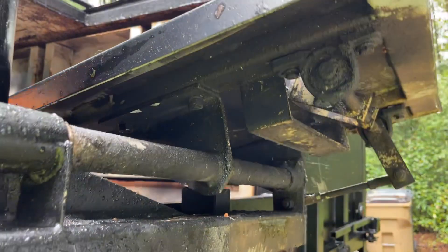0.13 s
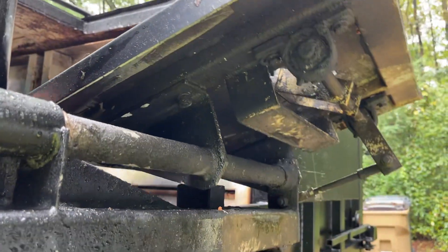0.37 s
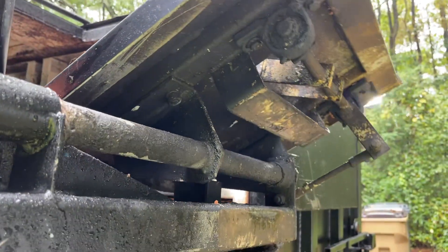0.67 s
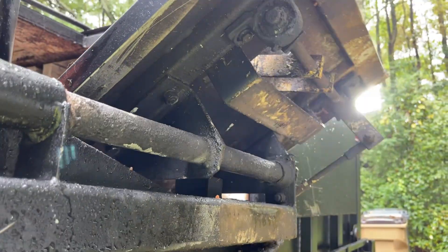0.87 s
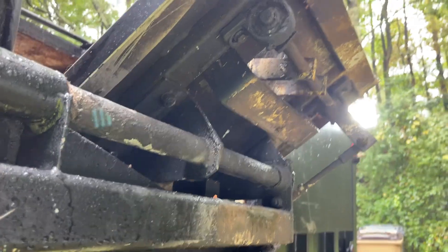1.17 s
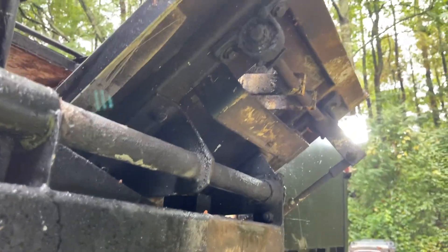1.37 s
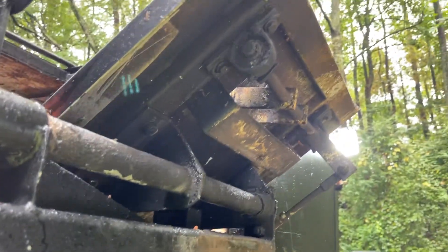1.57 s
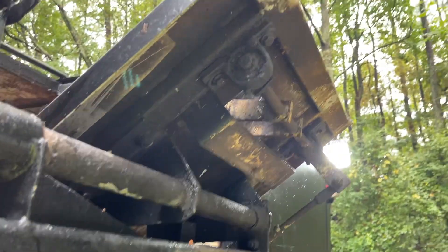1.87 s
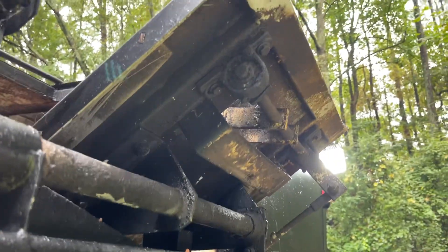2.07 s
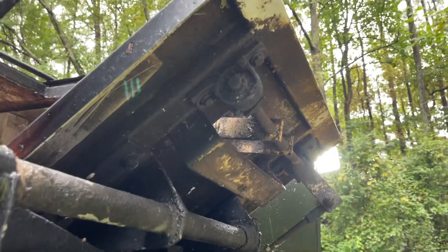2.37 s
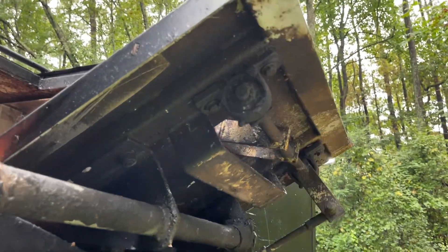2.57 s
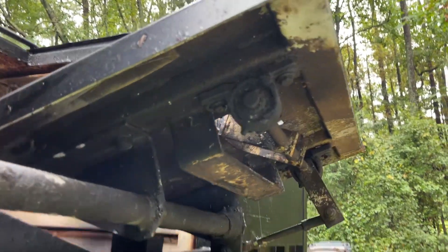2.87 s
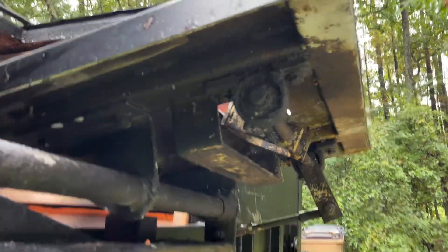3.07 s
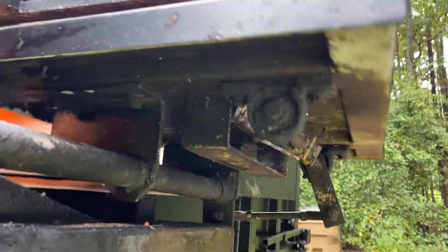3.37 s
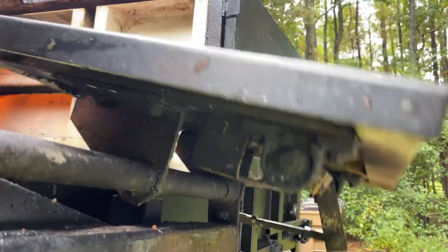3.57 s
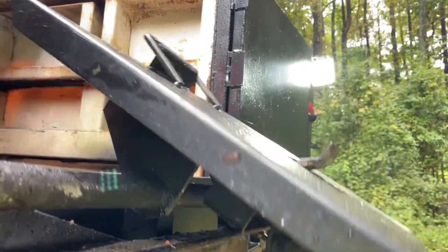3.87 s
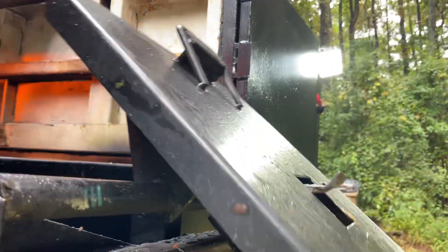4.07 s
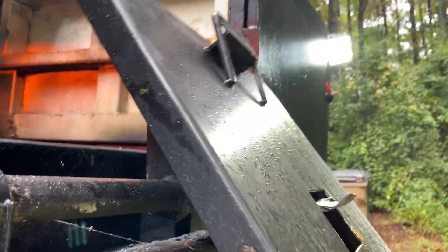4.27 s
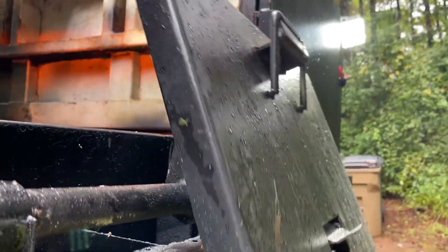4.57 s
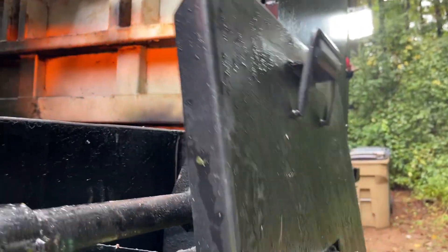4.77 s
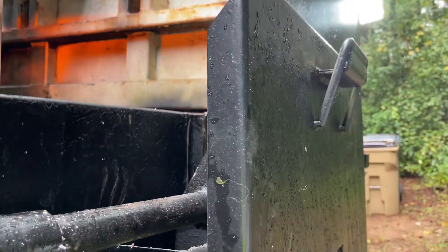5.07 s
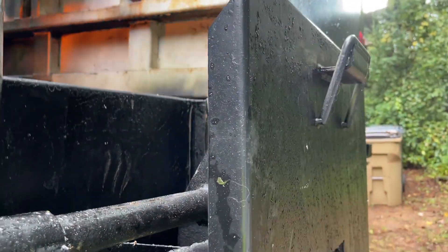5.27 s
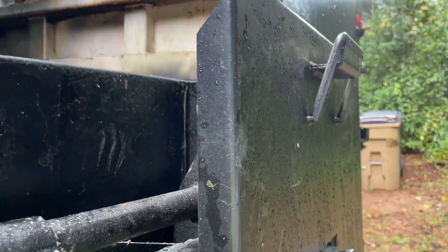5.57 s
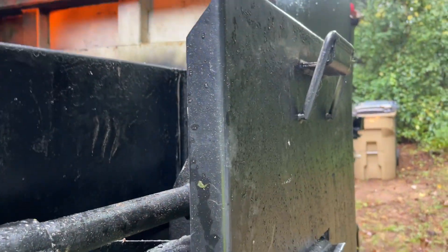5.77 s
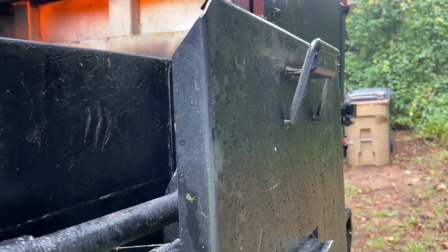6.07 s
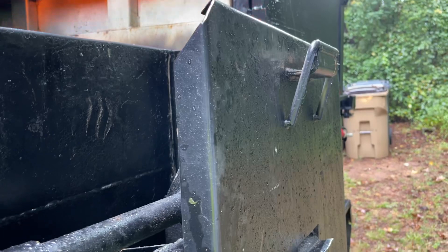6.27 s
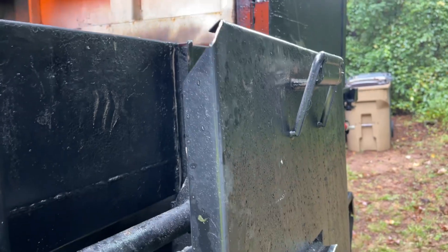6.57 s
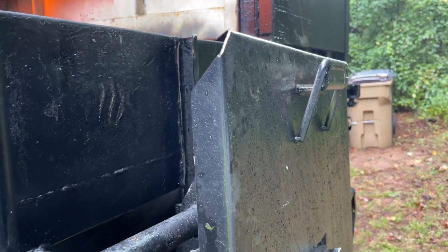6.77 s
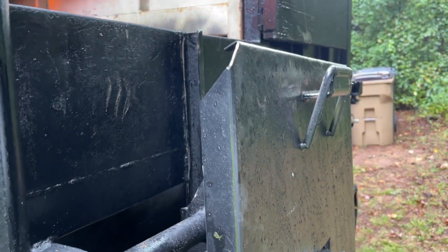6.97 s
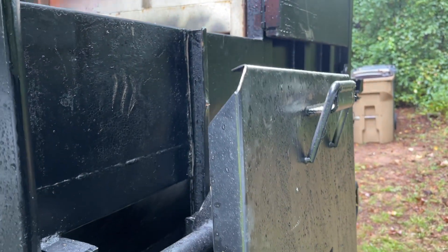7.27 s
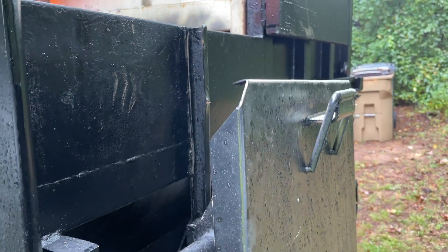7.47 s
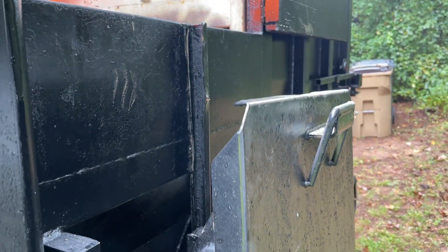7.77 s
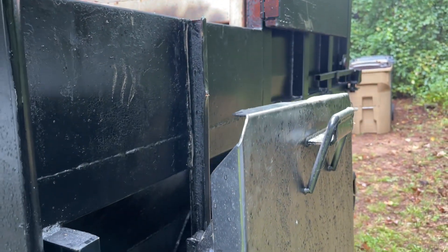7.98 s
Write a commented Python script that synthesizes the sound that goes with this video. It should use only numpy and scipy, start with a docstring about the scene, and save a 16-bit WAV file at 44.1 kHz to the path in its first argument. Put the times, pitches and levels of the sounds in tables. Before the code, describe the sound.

Near microphone beside a refuse truck's steel mechanism in a wood. The diesel idles steadily over quiet insect hiss. Sharp clanks start, then a short metal screech comes as the revs dip and rebound. A harder screech and heavy bangs follow, with loose rattling and a crowd of smaller knocks. These grow sparse under a wavering hydraulic hum, until a late clank and scrape; the hum then falls away, leaving idle and a tiny knock.

```python
"""A refuse truck idles in a wood: an eight-cylinder diesel throbs, sines at multiples of its cycle rate,
over filtered engine and fan noise, while insects hiss in two noise bands. Two soft rings come first. From 1.2 s
bursts of clicks make the steel panel and linkage knock and rattle, and slip pulses in noise make it screech.
The revs sag at 1.4 s and recover; then the rams work until 5.75 s and the gear pump's hum, sines at its tooth
rate and multiples, swells and wavers. The knocks crowd before 2.6 s, grow sparse until 4.9 s, and one last
knock comes near the end."""
import sys
import numpy as np
from scipy import signal
from scipy.fft import rfft, irfft
from scipy.io import wavfile

SR = 44100
rng = np.random.default_rng(int(sys.argv[2]) if len(sys.argv) > 2 else 0)


def transcribe(signal):
    """Save signal, clipped to [-1, 1], as a 16-bit WAV file at the path in sys.argv[1]."""
    frames = np.atleast_2d(signal).T
    limited = np.clip(frames, -1, 1)
    pcm = np.round(limited * 32767).astype(np.int16)
    wavfile.write(sys.argv[1], SR, pcm)


N = 358533
TIME = np.arange(N) / SR   # seconds
HZ = np.maximum(np.arange(N // 2 + 1) * SR / N, 1)   # spectrum frequencies, kept above zero for the logs

# Level difference between the ears: (frequency [Hz], left minus right [dB])
LEAN = [(60, 2), (150, -3), (350, 3.5), (860, 1.5), (2070, -2), (5030, 5), (12200, -2.5)]

IDLE_CYCLE_HZ = 4.99   # engine cycles (two crank turns) per second
TEETH_PER_CYCLE = 27.24   # pump teeth passing in one engine cycle
# A sudden load: start, depth factor, swing period, settling time
SAG_S, SAG_HZ, SAG_PERIOD_S, SAG_SETTLE_S = 1.42, 1.68, 1.1, .37
WORK_S, REST_S, WORK_FADE_S = 1.95, 5.75, 0.098   # the rams are under pressure between the first two
# At work the idle is lifted, then pulled down by the droop, which is full at the loud hum level
WORK_LIFT_HZ, DROOP_HZ, LOUD_HUM_DB = .105, .11, -19.5
SAG_DULLS_DB = 16   # loss of the higher pump harmonics per Hz of lost cycle speed
CATCH_S, CATCH_WIDTH_S, CATCH_DB = 1.9, .11, -31   # the 2nd harmonic swells as the revs catch up
# Exhaust gain of the low (boom) and high (pipe) orders, and its change per Hz of lost cycle speed
BOOM_DB, BOOM_SAG_DB, PIPE_DB, PIPE_SAG_DB = -0.5, 4, -1, -9
OVERSHOOT_DB = 18.5   # exhaust gain per Hz of overshoot in cycle speed
ROAR_DB = -31   # middle level of the roar
THUD_T60_S = 0.3
RATTLE_T60_S, RATTLE_RISE_S = 0.76, 0.01
TICK_SHARE = 0.61   # a tick's t60 as a share of its contact's t60
NEAR_LIKENESS = 0.73   # left-right likeness of the close panel from 600 Hz up
SLIP_HZ = 2287   # middle rate of stick and slip
SCREECH_RISE_S = 0.0064
CUTOFF_HZ = 13100   # the final low-pass is 70 dB down from here up


def amp(db):
    """Turn decibels into gain."""
    return 10 ** (np.asarray(db) / 20)


def rms_one(x):
    """Scale to unit rms."""
    return x / np.sqrt(np.mean(x ** 2) + 1e-20)


def in_time(rows):
    """Read each column of a timed table at every sample, with straight lines between points."""
    s, *columns = np.transpose(rows)
    return [np.interp(TIME, s, c) for c in columns]


def at_hz(points, hz):
    """Read a spectrum table on a log frequency axis."""
    table_hz, values = np.transpose(points)
    return np.interp(np.log(hz), np.log(table_hz), values)


def band(x, low_hz, high_hz):
    """Band-pass filter that keeps what lies between two frequencies."""
    return signal.sosfilt(signal.butter(2, [low_hz, high_hz], "band", fs=SR, output="sos"), x)


def peaks(table):
    """Gain of resonances standing on a flat floor of 1."""
    return 1 + sum(amp(db) / (1 + (2 * (HZ - hz) / width) ** 4) for hz, width, db in table)


def drift(rate_hz):
    """Random wandering: straight lines between normal draws, at most 40 a second."""
    knots = rng.standard_normal(int(N / SR * 40) + 2)
    return np.interp(TIME * min(rate_hz, 40), np.arange(len(knots)), knots)


def grit(per_s, spread_db):
    """Two trains of clicks with random times, sizes and signs, rms 1."""
    sizes = amp(spread_db * np.minimum(rng.exponential(1, (2, N)), 4))
    signs = rng.choice([-1, 1], (2, N))
    happens = rng.random((2, N)) < per_s / SR
    return rms_one(sizes * signs * happens)


def ring(x, hz, t60):
    """Resonator: a unit click sets a dying sine of starting height 1 ringing."""
    radius = amp(-60 / (t60 * SR))
    angle = 2 * np.pi * hz / SR
    feedback = [1, -2 * radius * np.cos(angle), radius * radius]
    return signal.lfilter([0, np.sin(angle)], feedback, x + 1e-18)


def stereo(pair, gain=1):
    """Mix two unrelated draws into left and right, alike in the bass and less so over most of the treble."""
    # How alike the ears are: (frequency [Hz], left-right likeness [-1 to 1])
    likeness = [(60, .99), (130, .98), (270, .95), (590, .58), (1250, .09), (2670, .15), (5710, .67),
                (12200, -.4)]
    mid, side = rfft(pair, axis=1) * gain
    alike = np.clip(at_hz(likeness, HZ), -1, 1)
    lean = amp(at_hz(LEAN, HZ) / 2)
    mid = np.sqrt((1 + alike) / 2) * mid
    side = np.sqrt((1 - alike) / 2) * side
    return irfft(np.array([(mid + side) * lean, (mid - side) / lean]), N, axis=1)


def near(pair, gain=1):
    """A close source: mostly one sound in both ears, most alike in the bass, shifted in phase and level."""
    # Phase between the ears for the close panel: (frequency [Hz], left leads by [radians])
    near_phase = [(0, 0), (400, 0), (1290, 0.5), (2070, 7), (2840, 7), (6630, 7), (7840, 8), (8870, 4.5),
                  (11800, 3.5), (12400, -14)]
    one, other = rfft(pair, axis=1) * gain
    alike = NEAR_LIKENESS ** np.clip(HZ / 600, 0, 1)
    lean = amp(at_hz(LEAN, HZ) / 2)
    late = np.exp(-1j * np.interp(HZ, *np.transpose(near_phase)))
    right = alike * one * late + np.sqrt(1 - alike ** 2) * other
    return irfft(np.array([one * lean, right / lean]), N, axis=1)


def at_work():
    """0 at rest, 1 while the rams are under pressure, with smooth changes."""
    return (np.tanh((TIME - WORK_S) / WORK_FADE_S) - np.tanh((TIME - REST_S) / WORK_FADE_S)) / 2


def governor_swing():
    """Cycle speed above idle in Hz: the load makes a dip, the governor swings back over, and that dies away."""
    age = np.maximum(TIME - SAG_S, 0)
    turns = np.minimum(age / SAG_PERIOD_S, .75)   # stop at the overshoot, so no second dip follows
    return -SAG_HZ * np.exp(-age / SAG_SETTLE_S) * np.sin(2 * np.pi * turns)


def engine_and_pump():
    """Engine-cycle multiples pass the fixed pipe resonances; the geared pump hums at its tooth rate."""
    # Uneven firing at idle: (multiple of the cycle rate, level before exhaust gain [dB])
    orders_at_idle = [(8, -43), (10, -50), (11, -52), (12, -38), (13, -43), (14, -50), (16, -43), (18, -51),
                      (19, -45), (21, -44), (33, -52), (34, -52), (35, -45), (36, -46), (37, -50),
                      (49, -47), (50, -46), (52, -45), (53, -47), (54, -38), (55, -39), (56, -49),
                      (57, -43), (58, -46)]
    # Exhaust pipe resonances: (frequency [Hz], gain [dB])
    pipe = [(45, -23), (66, 6.5), (80, -6), (178, -7), (215, -3), (245, -8.5), (275, -2), (300, -23)]
    # Pump hum at its tooth rate, before wavering: (time [s], level [dB])
    hum = [(0, -33.5), (.6, -38.5), (1.15, -31), (1.3, -23.5), (1.42, -35), (1.8, -37.5), (2.1, -30),
           (2.45, -33), (3.15, -27), (3.6, -20.5), (3.92, -28), (4.15, -21), (4.45, -19.5), (4.7, -24),
           (5.05, -23), (5.4, -19), (5.7, -28), (6.6, -30.5), (8.13, -29.5)]
    # Pump harmonics: (multiple of the tooth rate, level at rest [dB], level at work [dB])
    harmonics = [(2, -39, -42.5), (3, -63, -42), (4, -51.5, -51.5)]
    # Higher pump harmonics: (multiple of the tooth rate, level relative to the 4th [dB])
    upper_harmonics = [(5, -7.5), (6, -6), (8, -11.5)]

    work, swing, hum_db = at_work(), governor_swing(), in_time(hum)[0]
    lost, over = np.maximum(-swing, 0), np.maximum(swing, 0)
    droop_hz = DROOP_HZ * amp(hum_db - LOUD_HUM_DB)
    cycle_hz = IDLE_CYCLE_HZ + swing + work * (WORK_LIFT_HZ - droop_hz)
    cycle = 2 * np.pi * np.cumsum(cycle_hz) / SR
    boom_db = BOOM_DB + BOOM_SAG_DB * lost + OVERSHOOT_DB * over
    pipe_db = PIPE_DB + PIPE_SAG_DB * lost + OVERSHOOT_DB * over
    slow = slice(0, N, 64)   # gains change slowly, so work them out at every 64th sample
    out = np.zeros(N)
    for order, db in orders_at_idle:
        shift_db = at_hz(pipe, order * cycle_hz[slow]) - at_hz(pipe, order * IDLE_CYCLE_HZ)
        effort_db = boom_db if order < 27 else pipe_db
        waver_db = 0.6 * drift(5.0)   # no two cycles fire alike
        gain = amp(db + shift_db + (effort_db + waver_db)[slow])
        tone = np.sin(order * cycle + 2 * np.pi * rng.random())
        out += np.interp(TIME, TIME[slow], gain) * tone

    gains = {m: amp(rest + (busy - rest) * work - SAG_DULLS_DB * lost) for m, rest, busy in harmonics}
    gains.update({m: gains[4] * amp(relative_db) for m, relative_db in upper_harmonics})
    gains[1] = amp(hum_db)
    gains[2] = gains[2] + amp(CATCH_DB) * np.exp(-((TIME - CATCH_S) / CATCH_WIDTH_S) ** 2)
    for multiple, gain in gains.items():
        waver_db = 1.38 * np.sqrt(multiple) * drift(9.3)
        tone = np.sin(multiple * TEETH_PER_CYCLE * cycle + 2 * np.pi * rng.random())
        out += gain * amp(waver_db) * tone
    # The root of 2 makes the levels rms; the right is slightly louder
    return np.sqrt(2) * out * amp([[-.3], [.3]])


def roar():
    """Broad engine and fan noise, coloured by body resonances."""
    # Noise colour before scaling: (frequency [Hz], level [dB per Hz])
    roar_colour = [(15, -33.5), (25, -7.5), (139, -6), (211, -15.5), (273, -3.5), (337, -15.5), (552, -20),
                   (612, -22.5), (774, -19.5), (4420, -41.5), (6700, -38.5), (9390, -39.5), (10200, -63.5),
                   (11300, -52), (12500, -92), (16200, -123), (22000, -120)]
    # Body resonances: (frequency [Hz], width [Hz], gain added to the floor of 1 [dB])
    roar_peaks = [(176.2, 24, 10), (263.6, 34.4, 4.5), (457.6, 14.4, 5.5), (764, 19.6, 4), (1213, 34, -1),
                  (1333, 21, 0.5), (1710, 98, -7), (1040, 17, -22), (1512, 21, 4.5), (2570, 530, -7.5)]
    gain = amp(at_hz(roar_colour, HZ)) * peaks(roar_peaks)
    noise = rms_one(stereo(rng.standard_normal((2, N)), gain))
    return amp(ROAR_DB + 0.1 * drift(12.0)) * noise


def insects():
    """Each chorus is a band of smooth hiss that flutters a little."""
    # Choruses: (centre [Hz], width [Hz], middle level [dB], added left minus right [dB])
    choruses = [(6606, 660, -52.5, 0.5), (11220, 730, -59.5, 2)]
    out = 0
    for hz, width, db, pan_db in choruses:
        bell = np.exp(-((HZ - hz) / width) ** 2 * 2)
        hiss = rms_one(stereo(rng.standard_normal((2, N)), bell))
        pan = amp([[pan_db / 2], [-pan_db / 2]])
        out = out + amp(db + 0.94 * drift(30.0)) * hiss * pan
    return out


def soft_ring():
    """Light taps each set one panel mode swelling and dying, as a sine."""
    # Light taps: (time [s], mode [Hz], level before the swell [dB], t60 [s])
    soft_taps = [(.396, 612, -31, .25), (.612, 2390, -50, .15)]
    out = 0
    for s, hz, db, t60 in soft_taps:
        age = np.maximum(TIME - s, 0)
        swell = 1 - np.exp(-age / .015)
        out = out + amp(db - 60 * age / t60) * swell * np.sin(2 * np.pi * hz * age)
    return out


def add(power, s, db, t60, rise_s):
    """Add the power of a blow that rises fast and dies away, for at most half a second."""
    i = int(s * SR)
    age = TIME[:min(SR // 2, N - i)]
    power[i:i + len(age)] += amp(2 * (db - 60 * age / t60)) * (1 - np.exp(-age / rise_s))


def steel(force, nearest_hz):
    """The panel rings, most in the modes nearest each blow, over a broad clatter."""
    # Panel modes: (frequency [Hz], relative level [dB], t60 before limits [s])
    panel_modes = [(641, -3, 0.15), (695, 6.5, 0.12), (775, 4, 0.11), (864, -2.5, 0.07), (945, 7.5, 0.052),
                   (1020, 6.5, 0.095), (1148, 6.5, 0.042), (1258, 8.5, 0.032), (1480, 7, 0.048),
                   (1575, 9.5, 0.074), (1777, 1.5, 0.12), (2280, -13, 0.063), (2414, -6, 0.053),
                   (2715, -3, 0.027), (3120, -24, 0.069), (4000, -1, 0.016)]
    rings = 0
    for hz, db, t60 in panel_modes:
        everywhere = 0.25 * np.minimum(nearest_hz / hz, 1) ** 0.46
        close_by = np.exp(-(np.log2(hz / nearest_hz) / 0.38) ** 2)
        ringing = ring(force * (everywhere + close_by), hz, np.clip(t60, .02, .12))
        rings = rings + amp(db) * ringing / np.sqrt(t60)
    clatter = rms_one(band(band(force, 230, 3240), 83, 2970))
    return (rms_one(rings) + 0.34 * clatter) * np.sqrt(np.mean(force ** 2))


def knocks_and_rattle():
    """Fast-dying sprays of contacts strike the panel, with shorter ticks on top, low thuds and loose rattles."""
    # Knocks: (time [s], contact level [dB], tick level [dB], contact t60 [s], modes nearest the blow [Hz])
    knocks = [(1.232, -20.5, -27, 0.082, 1290), (1.255, -24, -30, 0.091, 800), (1.276, -21, -35, .14, 910),
              (1.291, -15, -29.5, 0.13, 730), (1.563, -16, -32, 0.11, 2600),
              (1.576, -12.5, -38, 0.073, 2700), (1.611, -26, -34, 0.13, 734),
              (1.63, -29.5, -33, 0.11, 2700), (1.948, -17, -57, 0.062, 920), (2.173, -6, -16, 0.14, 820),
              (2.188, -4.5, -24, 0.077, 740), (2.2, -9, -14, .05, 1860), (2.242, -12, -34.5, .1, 1190),
              (2.33, -30.5, -42, 0.069, 1500), (2.397, -31, -28.5, .055, 980),
              (2.46, -25.5, -40, 0.084, 1340), (2.489, -31, -34, .085, 800), (2.503, -18.5, -45, .09, 1160),
              (2.523, -21.5, -39, 0.11, 1590), (2.541, -25, -41, 0.071, 1200),
              (2.556, -13, -45, 0.096, 1160), (2.669, -46, -34, 0.1, 1200), (2.711, -47, -36.5, 0.1, 1200),
              (2.947, -28, -55, 0.087, 1460), (3.242, -23, -50, 0.05, 1540),
              (3.301, -15.5, -26.5, 0.089, 1520), (3.381, -32, -42, 0.088, 1500),
              (3.411, -29, -54, 0.084, 1540), (3.536, -49, -40, .1, 990), (3.686, -36, -40, .065, 786),
              (4.674, -39, -37.5, 0.16, 1510), (4.902, -23, -26.5, 0.13, 2900),
              (4.925, -25.5, -50, 0.071, 754), (7.876, -33.5, -35.5, .15, 2800)]
    # The whole panel jolts: (time [s], level [dB])
    thuds = [(1.238, -17.5), (1.284, -15), (1.629, -28), (2.167, -9.5), (2.199, -23), (2.279, -22.5),
             (2.49, -15), (2.559, -21), (3.409, -22.5), (4.94, -24.5)]
    # Loose parts start shaking around a knock and die away slowly: (time [s], level [dB])
    rattles = [(1.24, -28), (1.56, -31), (2.142, -18.5), (2.45, -20.5), (3.24, -25.5), (3.31, -24.5),
               (4.93, -34)]
    thud, clank, tick, shake = np.zeros((4, N))   # powers, which add
    nearest_hz = np.ones(N)
    for s, db, tick_db, t60, hz in knocks:
        add(clank, s, db, t60, .0016)
        add(tick, s, tick_db, TICK_SHARE * t60, .0008)
        nearest_hz[int(s * SR):] = hz
    for s, db in thuds:
        add(thud, s, db, THUD_T60_S, .01)
    for s, db in rattles:
        add(shake, s, db, RATTLE_T60_S, RATTLE_RISE_S)
    low = np.sqrt(thud + shake) * rms_one(band(grit(1800, 4.5), 94, 502))
    high = np.sqrt(tick) * rms_one(band(grit(6000, 3.2), 2400, 14500))
    force = np.sqrt(clank + 0.021 * shake) * grit(4000, 2.94)
    return near(low + steel(force, nearest_hz) + high)


def slides():
    """Loudness of steel sliding on steel: each slide rises fast, holds and dies away."""
    # Slides: (time [s], level [dB], held [s], t60 of the dying away [s])
    slide_times = [(1.515, -14.5, .033, 0.15), (1.61, -35, 0.016, 0.11), (2.113, -14.5, 0.051, .065),
                   (4.901, -30, 0.021, 0.096)]
    out = 0
    for s, db, held, t60 in slide_times:
        age = np.maximum(TIME - s, 0)
        rise = np.minimum(age / SCREECH_RISE_S, 1) ** 2
        out = out + amp(db - 60 * np.maximum(age - held, 0) / t60) * rise
    return out


def screech():
    """Steel sticks and slips at an unsteady rate, half lost in friction noise."""
    # Screech colour before scaling: (frequency [Hz], level [dB per Hz])
    screech_colour = [(760, -38), (1300, -3), (2280, -8.5), (2920, -6), (6500, -12), (9070, 1.5),
                      (9970, -9), (11200, 11), (12600, 15.5), (16400, -44), (22000, -120)]
    # Squealing resonances: (frequency [Hz], width [Hz], gain added to the floor of 1 [dB])
    squeals = [(2180, 420, 0), (4850, 200, 0), (8800, 68, 2), (11430, 61, 4), (12080, 61, 4)]
    unsteady = 1 + 0.068 * drift(40.0) + .6 * rng.standard_normal(N)
    slips = np.cumsum(SLIP_HZ * unsteady / SR)
    slip_count = np.floor(np.maximum.accumulate(slips))
    # One pulse as each slip completes, less the average
    pulses = rms_one(np.diff(slip_count, prepend=0) - SLIP_HZ / SR)
    friction = grit(9000, 1.9)
    colour = amp(at_hz(screech_colour, HZ)) * peaks(squeals)
    rub = rms_one(near(0.92 * pulses + friction, colour))
    return slides() * amp(1.6 * drift(37.7)) * rub


def scene():
    """All sources together."""
    return engine_and_pump() + roar() + insects() + soft_ring() + knocks_and_rattle() + screech()


def record(dry):
    """Loud peaks are rounded, then the top of the treble is cut."""
    rounded = .9 * np.tanh(dry / .9)
    return signal.sosfilt(signal.cheby2(12, 70, CUTOFF_HZ, fs=SR, output="sos"), rounded)


dry = scene()
out = record(dry)
transcribe(out)
```